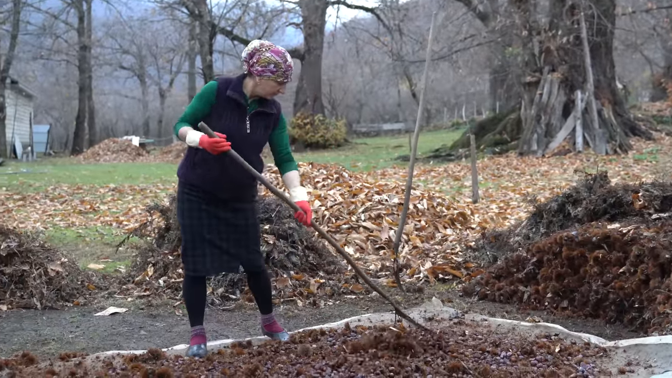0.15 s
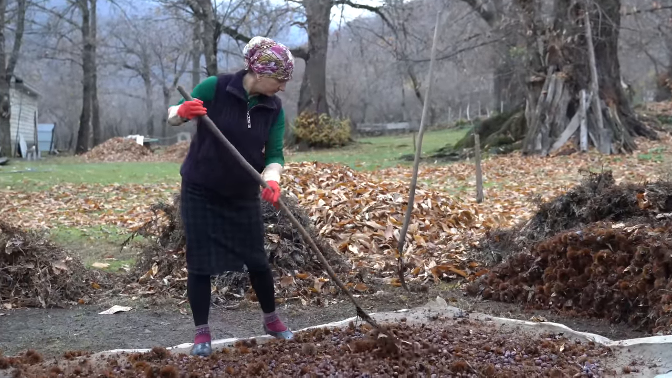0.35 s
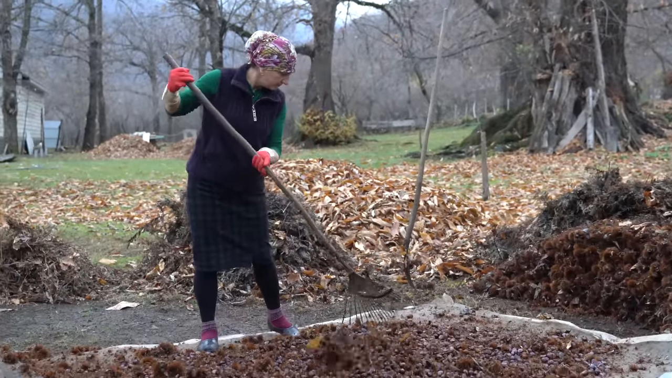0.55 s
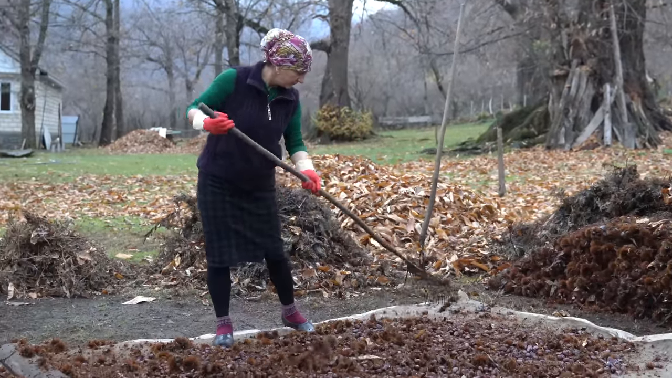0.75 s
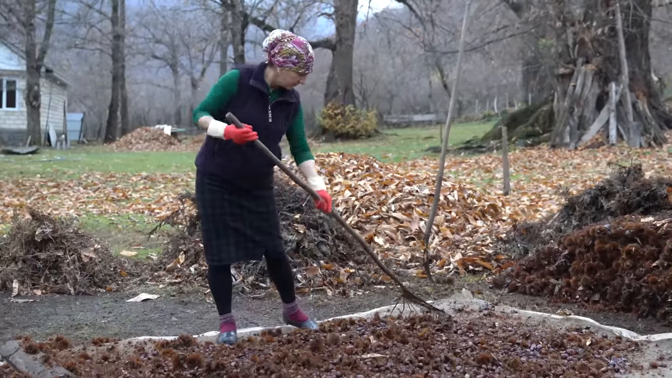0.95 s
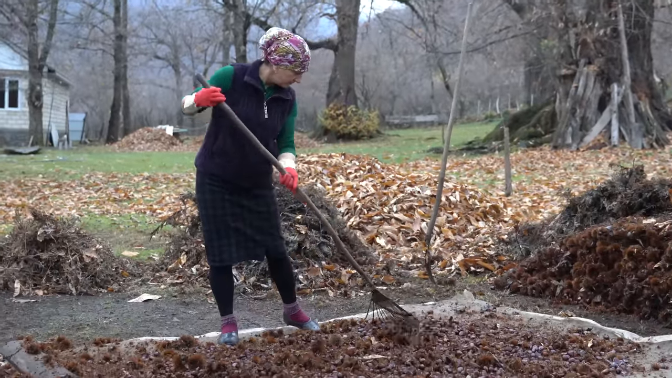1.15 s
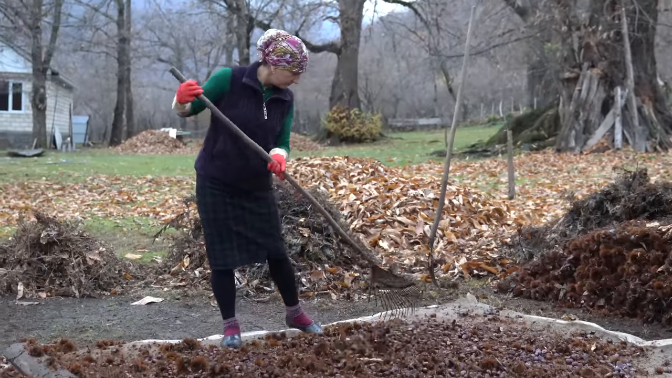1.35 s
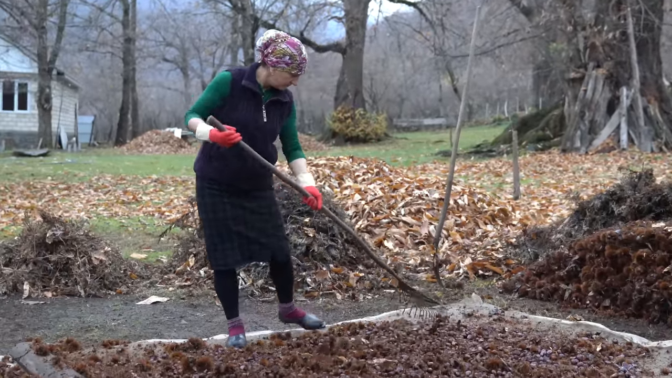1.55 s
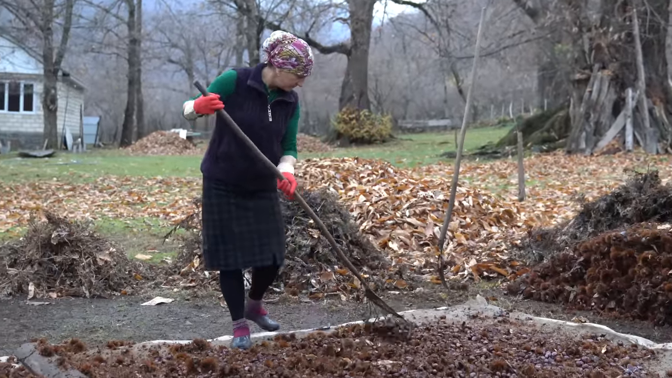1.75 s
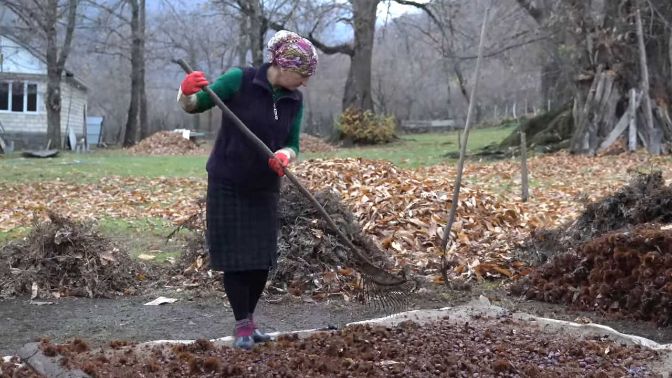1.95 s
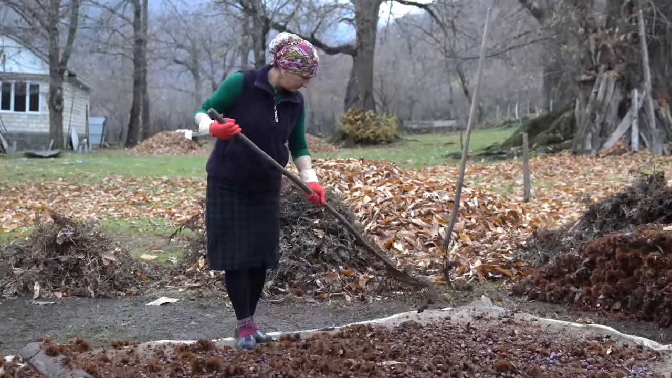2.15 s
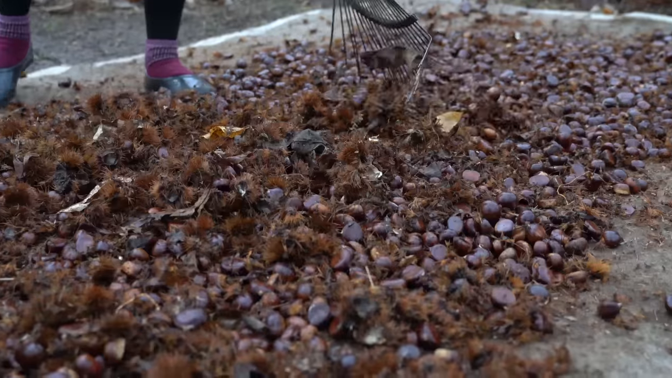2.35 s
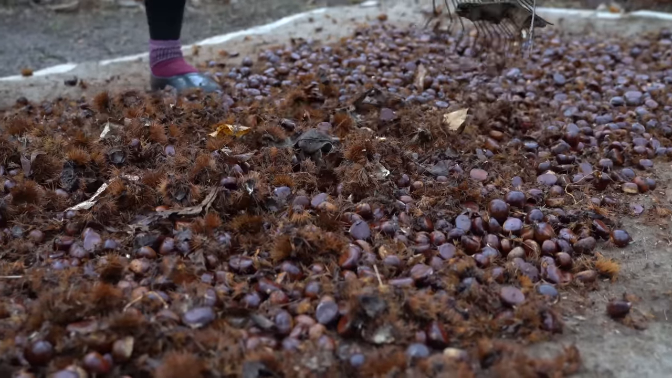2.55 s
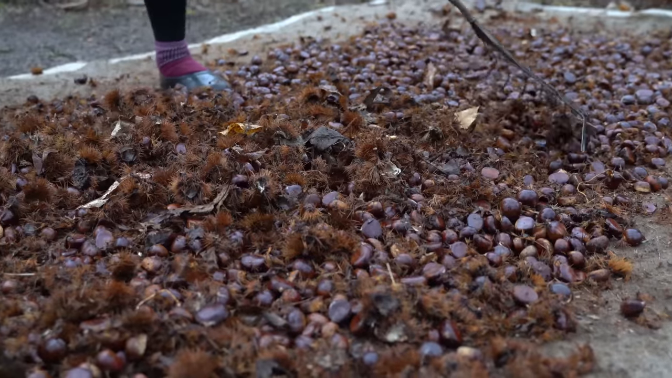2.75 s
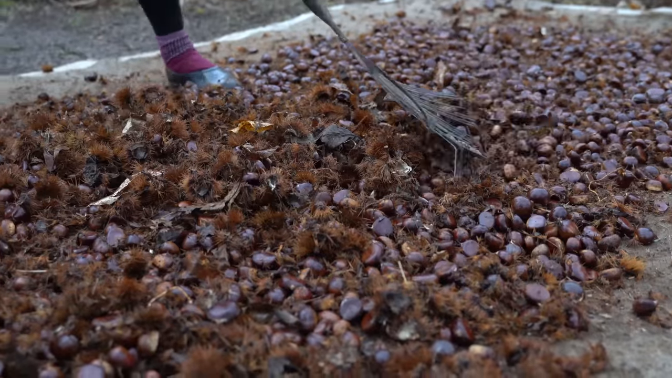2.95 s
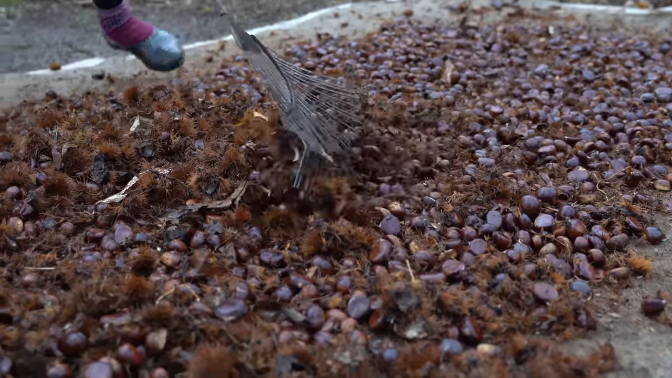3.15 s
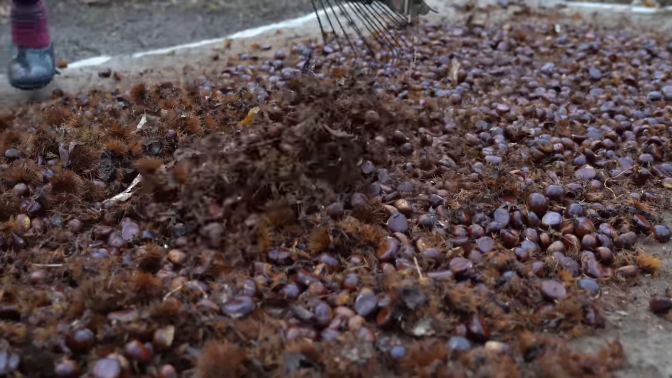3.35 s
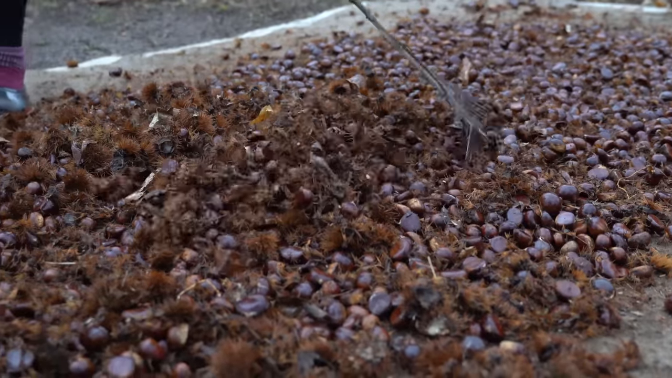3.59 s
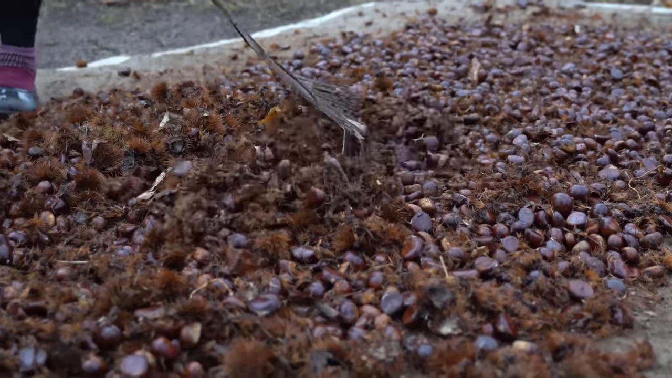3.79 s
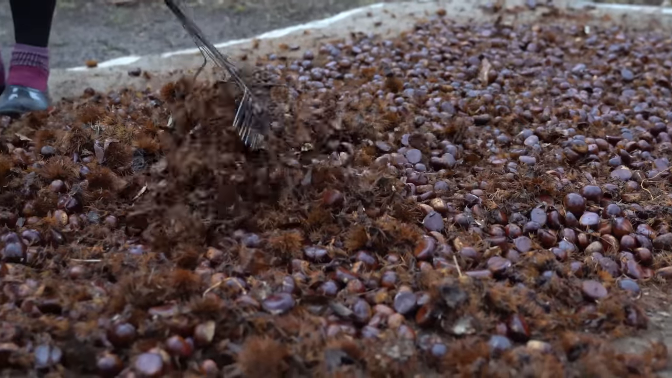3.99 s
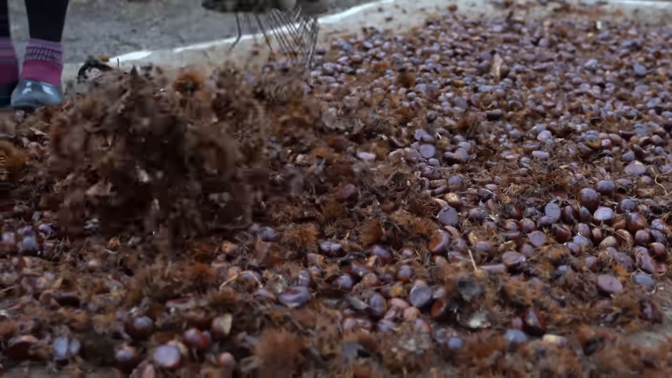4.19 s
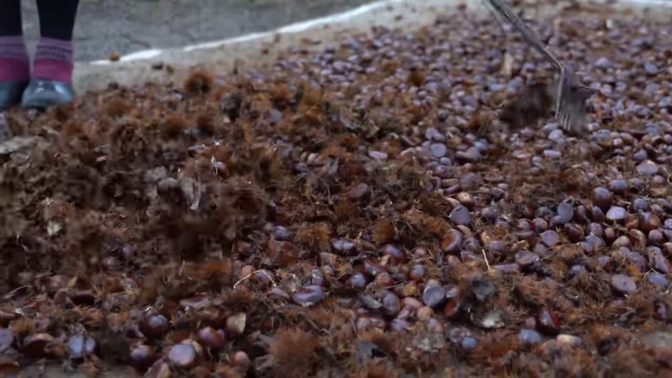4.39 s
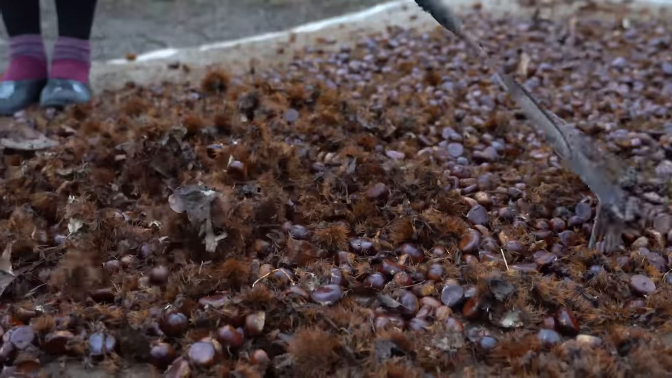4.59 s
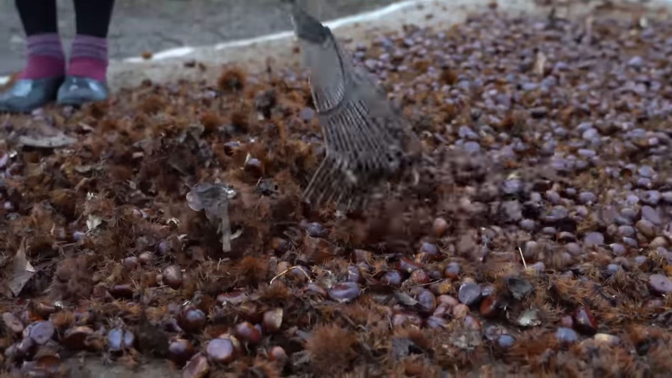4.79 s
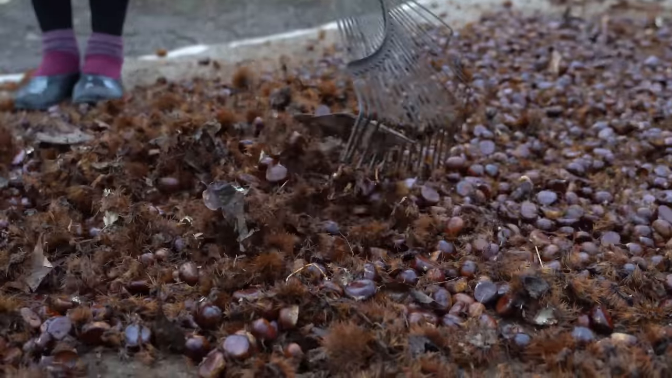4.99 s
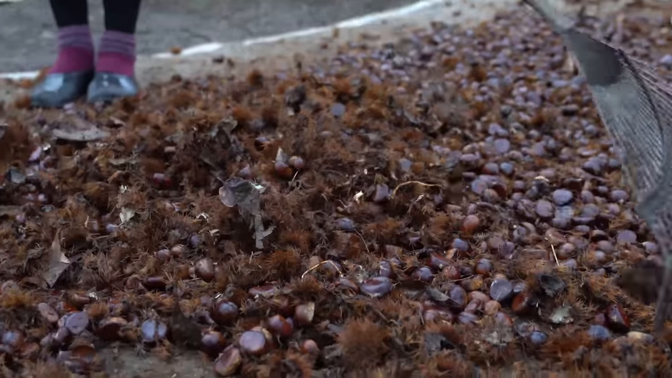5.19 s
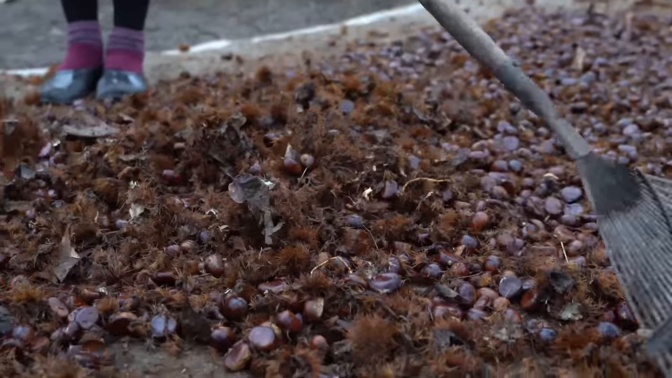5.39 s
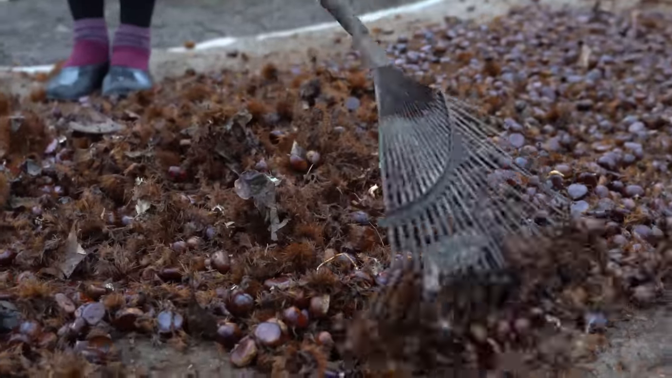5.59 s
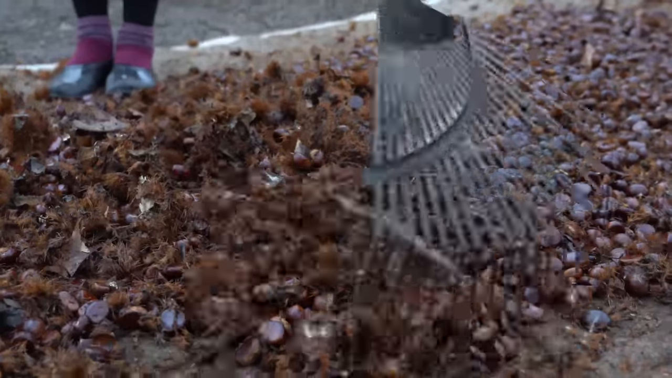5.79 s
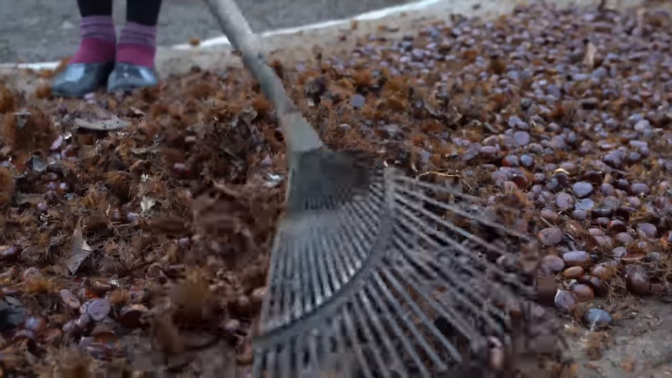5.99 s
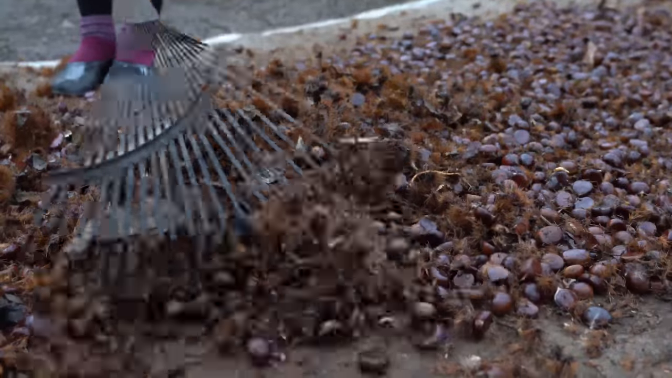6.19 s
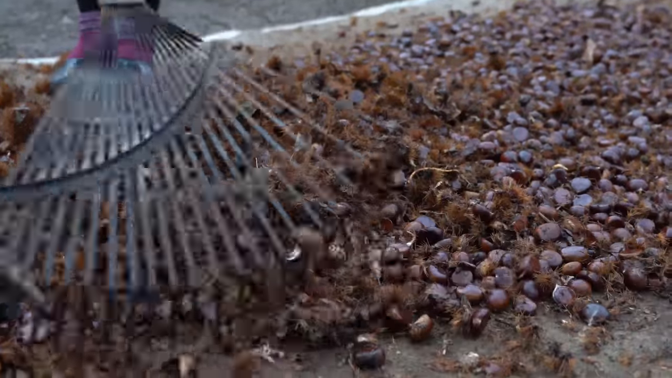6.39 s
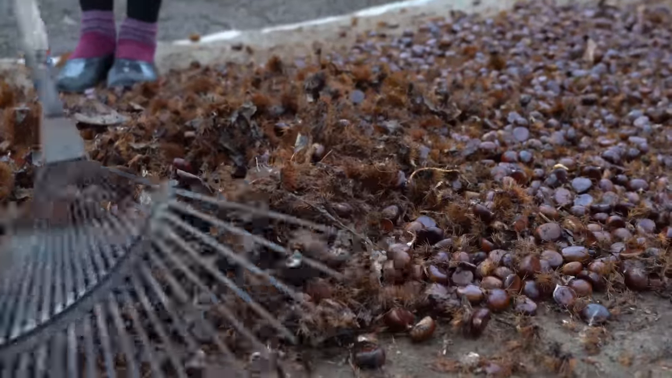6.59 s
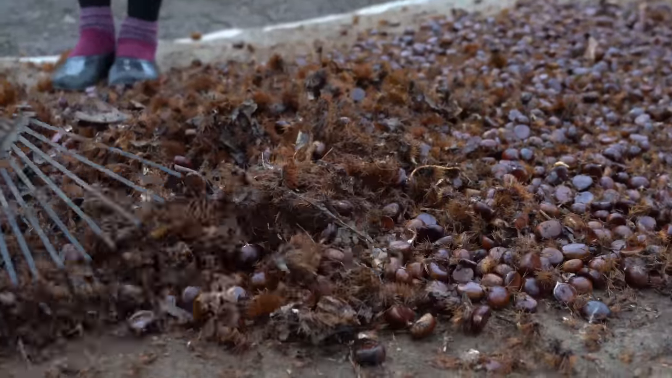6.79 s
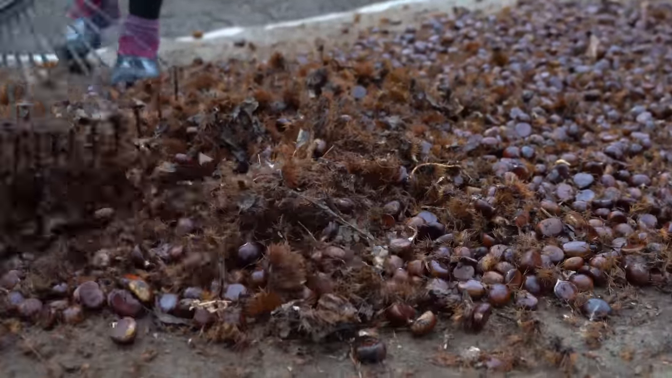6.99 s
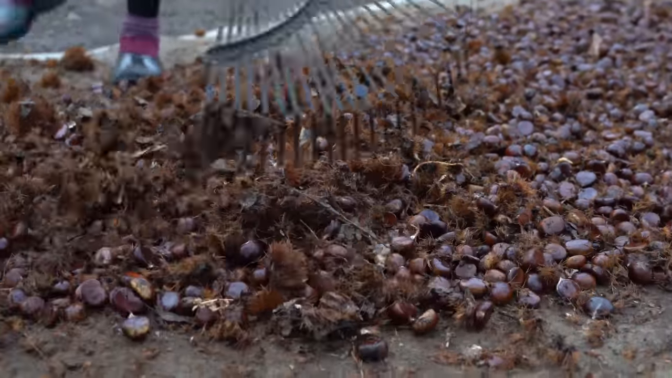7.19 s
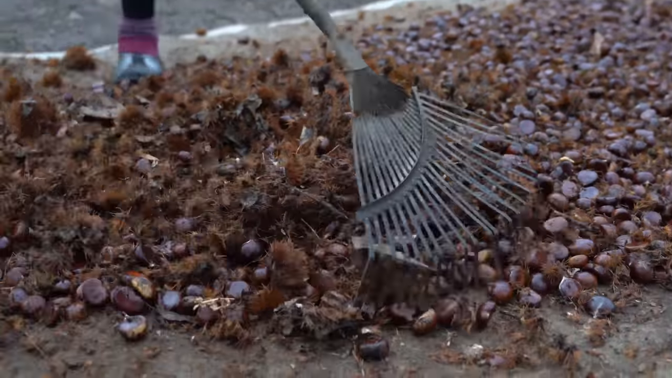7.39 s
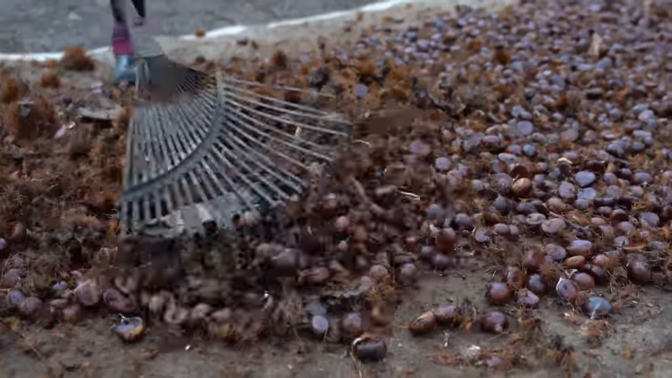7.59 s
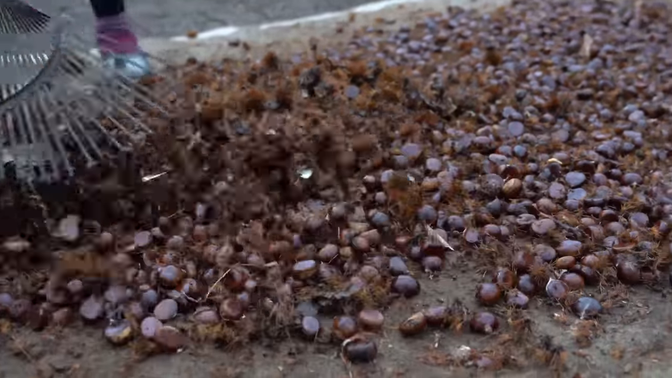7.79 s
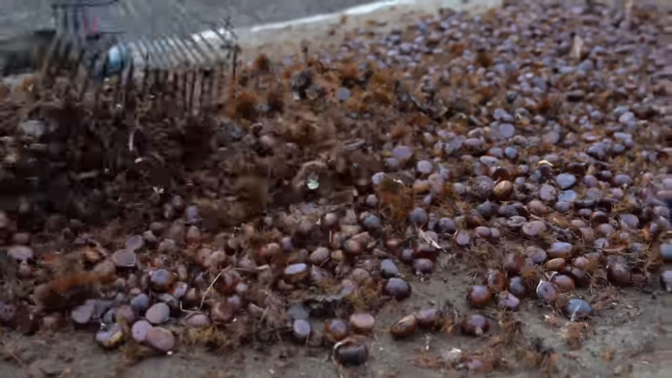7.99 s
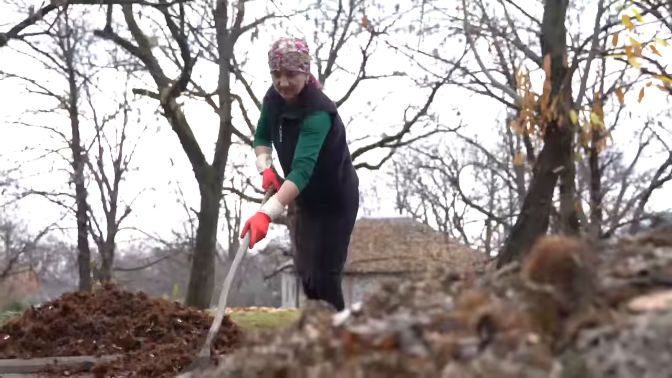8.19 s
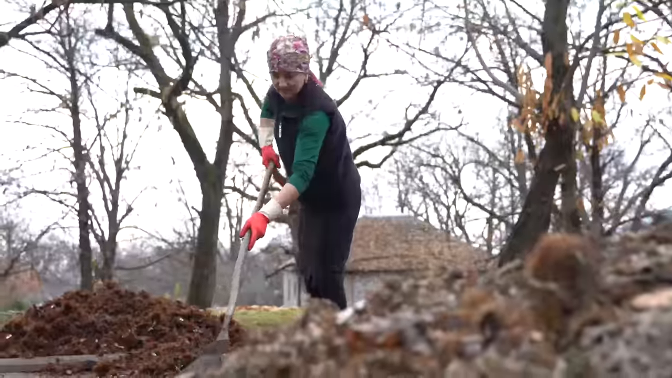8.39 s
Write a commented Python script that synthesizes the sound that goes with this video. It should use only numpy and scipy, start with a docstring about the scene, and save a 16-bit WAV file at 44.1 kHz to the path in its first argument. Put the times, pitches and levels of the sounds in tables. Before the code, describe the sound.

A steel rake scrapes in repeated strokes through dry crackling chestnut burrs, its tines rattling and loose nuts knocking, outdoors.

```python
"""Raking chestnut burrs.

A steel fan rake is pulled in twelve strokes through dry burrs, nuts and leaves. Spines crackle,
the heap shifts, tines catch, spring free and ring, and loose nuts knock as they settle.
The burrs' tone steps from a few paces away to close by, then to afar.
Behind it: quiet open air, faint distant hums, a few small birds."""
import sys
import numpy as np
from scipy import signal
from scipy.fft import rfft, irfft, next_fast_len
from scipy.io import wavfile
from scipy.ndimage import uniform_filter1d

SR = 44100
rng = np.random.default_rng(int(sys.argv[2]) if len(sys.argv) > 2 else 0)


def int16_out(signal):
    """Quantize to a 16-bit WAV file."""
    q = np.round(np.clip(np.atleast_2d(signal).T, -1, 1) * 32767)
    wavfile.write(sys.argv[1], SR, q.astype(np.int16))


N = 372644

# rake strokes; heap, tine and spine levels relative to the pull:
# start_s, to_full_speed_s, pull_db, rise_s, fall_s, heap_db, tine_db, spine_db, settle_db
RAKE_STROKES = [(0.189, 0.098, -42.5, 0.031, 0.31, -11.5, -7.0, 0.5, -57.5),
                (0.963, 0.18, -33, 0.04, 0.16, -21, -10, 2.5, -59),
                (1.69, 0.1, -38, 0.085, 0.093, -17.5, -6.5, 0, -57.5),
                (2.34, 0.028, -31, 0.11, 0.076, -24.5, -12, -4.5, -52.5),
                (2.796, 0.15, -25.5, 0.097, 0.12, -27.5, -9.5, -5, -43.5),
                (3.639, 0.12, -28.5, 0.069, 0.099, -22, -5, -4.5, -43.5),
                (4.617, 0.13, -23.5, 0.031, 0.11, -27, -6, -3, -48.5),
                (5.433, 0.14, -33.0, 0.045, 0.14, -15, -3, -1, -50),
                (6.004, 0.13, -28.0, 0.035, 0.091, -15, -5.5, -2.5, -47.5),
                (6.602, 0.14, -34, 0.04, 0.14, -10.5, -4, -2.5, -47),
                (7.412, 0.19, -33, 0.15, 0.13, -15, -1.5, 0, -49),
                (8.178, 0.13, -45, 0.12, 0.26, -25, -3.0, 1.5, -59)]
# tines bite or spring free; ring and spine relative: start_s, level_db, length_s, ring_db, spine_db
TINE_CATCHES = [(0.193, -48.5, 0.024, -0.5, 5.5), (0.254, -55, 0.012, -6, 12),
                (0.346, -31.5, 0.0059, -20, 2), (0.382, -39.5, 0.03, -10.5, 3.5),
                (0.6, -49.5, 0.013, -2.5, 0), (0.968, -41, 0.04, -8, -2.5), (1.027, -41, 0.017, -11, -5.5),
                (1.13, -34, 0.009, -14, 8.5), (1.703, -37, 0.013, -21, -3), (1.739, -34.5, 0.02, -25, -1.0),
                (1.792, -34.5, 0.039, -26, 3.5), (1.832, -34, 0.014, -15, 5.5),
                (2.023, -56, 0.022, -4, 0.5), (2.345, -34, 0.026, -3.5, 4), (2.379, -28, 0.015, -4, 0),
                (2.408, -46, 0.011, 4, 15.5), (2.633, -46.5, 0.0087, -15, -4.5),
                (2.8, -37, 0.025, -7.5, 1.5), (2.897, -22, 0.0066, -27, -10), (2.923, -22, 0.013, -8, -8),
                (2.947, -25.5, 0.025, -13, -1), (3.001, -30, 0.032, -4.5, -3),
                (3.087, -30.5, 0.027, -6, -4), (3.132, -37, 0.008, -5, 0), (3.176, -35, 0.012, -9, -2),
                (3.415, -44.5, 0.01, -7, -1), (3.643, -34.5, 0.026, -5.5, 0), (3.681, -25.5, 0.004, -25, 1),
                (3.75, -25.5, 0.018, -12, -3.5), (3.851, -32.5, 0.015, -1.5, 1.5),
                (4.154, -35, 0.03, -3.5, 0), (4.246, -44.5, 0.014, -2, -5), (4.408, -46.5, 0.024, 3, -8.5),
                (4.619, -35, 0.025, 0, -5.0), (4.675, -29, 0.054, -5, -5), (4.777, -27, 0.006, -18, 8.5),
                (5.439, -47.5, 0.022, 2, -0.5), (5.511, -37.5, 0.021, 1, -2), (5.761, -34.5, 0.019, 0, 3),
                (6.007, -42, 0.0089, 1, -3.0), (6.02, -35, 0.011, 3.5, -2.5),
                (6.066, -33.5, 0.049, -2, -4.5), (6.354, -35, 0.014, -1, 4), (6.603, -35.5, 0.02, -5, -9),
                (6.752, -29, 0.01, -16, -5.5), (6.892, -40.5, 0.011, 5, -18), (7.139, -59, 0.0057, 7, 6),
                (7.419, -35, 0.034, 0, 0.5), (7.494, -37, 0.032, 2, -9.5), (7.535, -24.5, 0.0057, -20, 1.5),
                (7.607, -32, 0.021, -1.5, 7), (7.743, -35.5, 0.016, -4, 1), (7.793, -41.5, 0.039, 2, 1),
                (7.838, -37.5, 0.011, 3, -6), (7.982, -41, 0.0067, -10.0, -2.5)]
# nuts hit each other or the ground: start_s, level_db, pitch_hz
NUT_KNOCKS = [(0.057, -48, 1120), (.076, -46, 1090), (.147, -43, 623), (.221, -41, 1030),
              (3.39, -38.5, 905), (3.56, -46.5, 443), (4.304, -39, 790), (4.333, -31, 1390),
              (4.414, -30, 1130), (5.0577, -37, 644), (6.5022, -27.5, 1790), (6.602, -37, 890),
              (7.08, -36, 1110), (7.138, -31.5, 1285), (7.198, -46, 1260), (7.213, -39, 1170),
              (7.256, -42, 2400)]
# a nut hits the fan of tines: start_s, level_db
FAN_STRIKES = [(3.281, -19.5), (4.1545, -37)]
# tines pressed through to hard ground: start_s, end_s, ring_db, rumble_db
GROUND_SCRAPES = [(5.475, 5.6, -54, -62.5), (5.552, 5.712, -31, -86), (6.043, 6.212, -37, -61),
                  (6.704, 6.837, -78, -60), (7.48, 7.664, -58, -80)]
# struck fan: pitch_hz, gain_db, t60_s
FAN_MODES = [(1044, -11, 0.086), (1170, 7.5, 0.017), (1470, -3, 0.044), (1850, -2, 0.044),
             (2430, -2, 0.036), (3300, -8, 0.036), (3700, -8, 0.034), (5400, -3, 0.019)]
# dragged tines and bent tines: centre_hz, width_hz, gain_db
TINE_MODES = [(1235, 24, -4.5), (1433, 150, -8.5), (1555, 31, 1), (1743, 240, -3), (2007, 230, -3.5),
              (2490, 150, -2.5), (3343, 94, -4.5), (3710, 39, -3), (3900, 68, -34), (5230, 52, -49),
              (5780, 97, 3)]
BENT_TINE_MODES = [(1260, 85, -2.5), (1338, 49, 4), (1560, 66, -5), (2550, 110, -4), (2623, 88, 0)]
# burr bed spectrum from each standpoint: freq_hz, gain_db
BED_MID_SPECTRUM = [(47, -71), (80, -46), (289, -41.5), (331, -40.5), (858, -19.5), (1090, -19),
                    (1280, -7.5), (3100, -7), (3700, -2), (4230, -7.5), (4830, -1), (7870, -3.5),
                    (8600, -8), (15000, -14), (16000, -14)]
BED_NEAR_SPECTRUM = [(47, -59), (80, -24), (222, -27), (629, -13), (687, -12), (1090, -5.5), (1280, 2.5),
                     (1600, -2.5), (2220, -3), (2490, -2), (3030, -5), (5520, -2.5), (8790, -8),
                     (15000, -7.5), (16000, -17.5)]
BED_FAR_SPECTRUM = [(47, -70), (80, -10), (265, -12), (527, -27), (643, -6), (785, -15), (1020, -1),
                    (1780, -6.5), (3790, -5), (7870, 1), (16000, -13)]
# standpoint switches, mid to near and near to far: time_s
STANDPOINT_SWITCHES_S = [2.335, 8.175]
# rake position: time_s, left_minus_right_db
RAKE_PAN = [(.3, -2), (1.2, -1.5), (1.8, -2.5), (2.4, -2), (3, -1.5), (3.8, -1), (4.7, -1), (5.2, -1.5),
            (5.6, -2.5), (6.1, -1), (6.8, -0.5), (7.3, -0.5), (7.6, -1.5), (8.3, 0.5)]
# open air: freq_hz, gain_db
AIR_SPECTRUM = [(15, -61), (25, -33), (127, -3.5), (185, -3), (754, 5.5), (818, 1.5), (2000, 0), (2220, -3),
                (2840, 0), (7310, -16), (8830, -13), (14800, -13), (16000, 3)]
# distant tones: start_s, end_s, pitch_hz, fundamental_db, octave_db
DISTANT_HUMS = [(0, 8.45, 69.4, -102, -88), (4.3, 5.4, 100, -89, -97), (4.4, 4.7, 540, -84, -68),
                (4.9, 5.45, 565, -79, -76)]
# small birds: start_s, length_s, start_hz, end_hz, level_db
BIRD_CHIRPS = [(0, 0.019, 2550, 2720, -49), (0.064, 0.033, 2780, 2590, -49), (0.14, 0.068, 2700, 2460, -53),
               (4.498, 0.024, 2170, 2780, -41.5), (4.52, .018, 5650, 6070, -41),
               (4.58, 0.012, 6000, 5900, -46)]
# left-right likeness: freq_hz, correlation
STEREO_CORRELATION = [(100, 1), (600, 0.84), (1400, 0.99), (2500, 0.18), (3900, 0.79), (6000, 0.39),
                      (9000, 0.29), (15000, 0.24)]
# microphone balance: freq_hz, left_minus_right_db
MIC_BALANCE = [(60, -3), (92, 0), (140, 1), (210, 0), (330, 1), (500, 2), (770, 1), (1170, 3), (1790, -0.5),
               (2740, 6), (4190, 1), (6410, -0.5), (9810, 0), (15000, -3)]
# microphone phase: freq_hz, left_lead_rad
MIC_PHASE = [(0, 0.3), (1460, -0.54), (1720, 0.83), (2580, -0.5), (3270, -0.68), (4910, -0.23),
             (8350, -0.14), (9300, 1.2), (11200, -1.44), (13200, 0.31), (13600, -0.21), (16500, -0.3)]

RISE_POWER, FALL_POWER = 0.86, 2.12  # a pull builds to a tug, eases off smoothly
INITIAL_UNREST_DB, SETTLE_DB_PER_S = -61, 20.5
CATCH_ATTACK_S, DEBRIS_DB, DEBRIS_DECAY_S = 0.0013, -16.5, 0.065
HUSK_PATCH_DB, CLUMP_DB, CLUMPS_PER_S = 2.8, 1.8, 55
CHIRP_JITTER_HZ = 900
CUTOFF_HZ = 15950


def amp(db):
    """Decibels to gain."""
    return 10 ** (np.asarray(db) / 20)


def unit(pair):
    """Stereo pair scaled to a centre rms of 1."""
    return pair / np.sqrt(np.mean(pair.mean(0) ** 2) + 1e-20)


def along(points, hz):
    """(freq_hz, value) points read on a log axis."""
    freq_hz, values = np.transpose(points)
    return np.interp(np.log(hz + 1), np.log(freq_hz + 1), values)


def filtered(x, response):
    """Apply a frequency response."""
    size = next_fast_len(N + 8192, True)
    return irfft(rfft(x, size) * response(np.fft.rfftfreq(size, 1 / SR)), size)[..., :N]


def band(hz, lo_hz, hi_hz, order=10):
    """Soft-edged band-pass gain."""
    return 1 / np.sqrt((1 + (lo_hz / (hz + 1)) ** order) * (1 + (hz / hi_hz) ** order))


def add(track, start_s, sound):
    """Mix a sound into a track."""
    part = track[..., max(round(start_s * SR), 0):][..., :sound.shape[-1]]
    part += sound[..., :part.shape[-1]]


def gate(start_s, end_s, fade_s):
    """On between two times, with linear fades."""
    t = np.arange(N) / SR
    return np.clip(np.minimum(t - start_s, end_s - t) / fade_s, 0, 1)


def shower(per_s, spread_db, life_s):
    """Envelope of random breaks, rms 1: instant onset, exponential decay."""
    breaks = rng.random(N) < per_s / SR
    sizes = amp(spread_db * np.clip(rng.standard_normal(N), -2, 2))
    energy = signal.lfilter([1], [1, -np.exp(-2 / (life_s * SR))], breaks * sizes ** 2)
    return np.sqrt(energy / energy.mean())


def patchy(depth_db=HUSK_PATCH_DB):
    """Two noises of shifting colour, as from husks of differing size."""
    spectra = signal.stft(rng.standard_normal((2, N)), nperseg=512)[2]
    patches = uniform_filter1d(rng.standard_normal(spectra.shape[1:]), size=3, axis=0)
    patches = uniform_filter1d(patches, size=8, axis=1)
    gain = amp(depth_db * np.clip(patches / patches.std(), -2, 2))
    return signal.istft(spectra * gain, nperseg=512)[1][:, :N]


def stereo(pair, colour):
    """Colour two unrelated signals and mix them as mid and side, most alike in the bass."""
    def response(hz):
        angle_rad = np.arccos(np.clip(along(STEREO_CORRELATION, hz), -1, 1)) / 2
        return colour(hz) * np.array([np.ones_like(hz), np.tan(angle_rad)])
    mid, side = filtered(pair, response)
    return np.array([mid + side, mid - side])


def air():
    """Faint steady rush of open country."""
    rush = stereo(patchy(0.85), lambda hz: amp(along(AIR_SPECTRUM, hz)) * band(hz, 45, 22000, order=4))
    return amp(-60.5) * unit(rush)


def humming():
    """Distant tones plus octave, wavering in pitch."""
    out = np.zeros(N)
    for start_s, end_s, pitch_hz, fundamental_db, octave_db in DISTANT_HUMS:
        waver = np.interp(np.arange(N), np.linspace(0, N, 160), rng.standard_normal(160))
        phase = 2 * np.pi * np.cumsum(pitch_hz * (1 + 0.014 * waver)) / SR
        tone = amp(fundamental_db) * np.sin(phase) + amp(octave_db) * np.sin(2 * phase)
        out += gate(start_s, end_s, fade_s=0.022) * np.sqrt(2) * tone
    return out


def birds():
    """Short gliding chirps, blurred by echoes from the trees."""
    chirps = np.zeros(N)
    for start_s, length_s, start_hz, end_hz, level_db in BIRD_CHIRPS:
        glide_hz = np.linspace(start_hz, end_hz, round(length_s * SR))
        glide_hz += CHIRP_JITTER_HZ * rng.standard_normal(len(glide_hz))
        phase = 2 * np.pi * np.cumsum(glide_hz) / SR
        add(chirps, start_s, amp(level_db) * np.hanning(len(phase)) * np.sin(phase))
    t = np.arange(SR // 4) / SR
    tail = rng.standard_normal((2, len(t))) * amp(-60 * t / 0.22)
    echoes = signal.fftconvolve(chirps[None], tail / np.linalg.norm(tail[0]), axes=1)[:, :N]
    return amp(-4) * chirps + amp(-7) * echoes


def bed(grains, lo_hz, hi_hz):
    """One band of the burr bed, rms about 1, coloured by the current standpoint."""
    standpoint = np.searchsorted(STANDPOINT_SWITCHES_S, np.arange(N) / SR)
    voices = [unit(stereo(grains, lambda hz: amp(along(spectrum, hz)) * band(hz, lo_hz, hi_hz)))
              for spectrum in (BED_MID_SPECTRUM, BED_NEAR_SPECTRUM, BED_FAR_SPECTRUM)]
    return np.choose(standpoint, voices)


def clumps():
    """Random gain, rms 1: burrs lie in clumps, so the crackle swells and thins."""
    knots = np.clip(rng.standard_normal(int(N / SR * CLUMPS_PER_S)), -2, 2)
    gain = amp(CLUMP_DB * np.interp(np.arange(N), np.linspace(0, N, len(knots)), knots))
    return gain / np.sqrt(np.mean(gain ** 2))


def settling():
    """Nuts and husks loosened by each pull rustle and tick into place."""
    power, t = np.zeros((2, N)), np.arange(2 * SR) / SR
    add(power, 0, amp(INITIAL_UNREST_DB - SETTLE_DB_PER_S * t) ** 2)
    for start_s, to_full_speed_s, *_, spine_db, settle_db in RAKE_STROKES:
        decay_db = SETTLE_DB_PER_S * np.maximum(t - to_full_speed_s, 0)
        unrest = np.minimum(t / to_full_speed_s, 1) * amp(settle_db - decay_db)
        add(power, start_s, np.outer([1, amp(spine_db)], unrest) ** 2)
    loose, prickly = np.sqrt(power)
    creaks = shower(per_s=260, spread_db=1, life_s=0.012)
    heap = amp(-5) * bed(creaks * patchy(4.2), 200, 1080)
    rustle = amp(2.5) * bed(creaks * patchy(), 1410, 6500)
    prickles = shower(per_s=480, spread_db=-5.5, life_s=0.0043)
    fizz = amp(1) * bed(prickles * patchy(1.1), 7700, 16000)
    nuts = shower(per_s=45, spread_db=2.5, life_s=0.0012) * patchy(4)
    husks = shower(per_s=60, spread_db=2.5, life_s=0.0008) * patchy(4)
    ticks = amp(-6) * bed(nuts, 700, 2730) + amp(-5) * bed(husks, 2300, 18000)
    return clumps() * (prickly * clumps() * fizz + loose * (heap + rustle + ticks))


def knocking():
    """Nuts knock dully for two or three cycles, with a tick of shell."""
    out, t = np.zeros(N), np.arange(SR // 25) / SR
    for start_s, level_db, pitch_hz in NUT_KNOCKS:
        cycles = pitch_hz * t
        body = np.sin(2 * np.pi * cycles) + 0.25 * np.sin(2 * np.pi * 3.6 * cycles)
        tick = 0.14 * rng.standard_normal(len(t))
        age = cycles / 0.49  # envelope peaks at age 1
        add(out, start_s, amp(level_db) * (body + tick) * age * np.exp(1 - age))
    return filtered(out, lambda hz: band(hz, 280, 9000, order=6))  # knocks carry nothing below about 300 Hz


def pulls():
    """Heap, tine, burr and spine envelopes, driven by pull speed."""
    power, t = np.zeros((4, N)), np.arange(SR) / SR
    for start_s, to_full_speed_s, pull_db, rise_s, fall_s, heap_db, tine_db, spine_db, _ in RAKE_STROKES:
        past_peak_s = t - to_full_speed_s
        rising = np.abs(past_peak_s / rise_s) ** RISE_POWER
        falling = np.abs(past_peak_s / fall_s) ** FALL_POWER
        speed = np.exp(-np.where(past_peak_s < 0, rising, falling))
        gains = amp(pull_db + np.array([heap_db, tine_db, 0, spine_db]))
        add(power, start_s, np.outer(gains, speed) ** 2)
    return np.sqrt(power)


def steel(taps, modes):
    """Taps ring the tine resonances, summed with alternating sign."""
    def response(hz):
        ring = sum((-1) ** k * amp(gain_db) * 1j * hz * width_hz
                   / (centre_hz ** 2 - hz ** 2 + 1j * hz * width_hz)
                   for k, (centre_hz, width_hz, gain_db) in enumerate(modes))
        return ring * band(hz, 840, 9000, order=5)
    return unit(stereo(taps, response))


def dragging():
    """The rake moves in small slips; each breaks spines, jolts the tines and shoves the heap."""
    shove, jolt, crunch, snap = pulls()
    slips = np.sqrt(0.25 + 0.75 * shower(per_s=190, spread_db=2.5, life_s=0.008) ** 2)
    cracks = slips * shower(per_s=6000, spread_db=1, life_s=0.0009)
    bumps = slips * shower(per_s=1600, spread_db=6, life_s=0.0076)
    heap = amp(2) * shove * bed(bumps * patchy(1.2), 197, 974)
    ground = amp(-26) * shove * bed(bumps * patchy(4.5), 35, 250)
    husks = amp(-1) * jolt * bed(bumps * patchy(3.7), 740, 2600)
    tines = jolt * steel(bumps * patchy(), TINE_MODES)
    burrs = amp(-1.5) * crunch * bed(cracks * patchy(), 2120, 5950)
    tufts = shower(per_s=500, spread_db=1, life_s=0.014)  # fine spines give way together
    spines = amp(-1.5) * snap * bed(tufts * cracks * patchy(), 7630, 25000)
    return ground + heap + husks + tines + clumps() * (burrs + clumps() * spines)


def catching():
    """A tine springs free and tears through the burrs, trailed by falling bits."""
    power, t = np.zeros((3, N)), np.arange(SR // 2) / SR
    attack = 1 - np.exp(-t / CATCH_ATTACK_S)
    debris = amp(DEBRIS_DB) * np.exp(-t / DEBRIS_DECAY_S)
    for start_s, level_db, length_s, ring_db, spine_db in TINE_CATCHES:
        burst = attack * (np.exp(-(t / length_s) ** 2) + debris)
        gains = amp(level_db + np.array([0, ring_db, spine_db]))
        add(power, start_s, np.outer(gains, burst) ** 2)
    crunch, ring, snap = np.sqrt(power)
    cracks = shower(per_s=3500, spread_db=1.5, life_s=0.0007)
    burrs = amp(1.5) * crunch * bed(cracks * patchy(), 2380, 5700)
    spines = amp(-1) * snap * bed(cracks * patchy(), 6950, 10600)
    tips = amp(1.5) * snap * bed(cracks * patchy(), 10900, 24000)
    tines = amp(-2.5) * ring * steel(patchy(), TINE_MODES)
    husks = amp(-0.5) * ring * bed(patchy(4.7), 450, 2160)
    tearing = burrs + spines + tips + tines + husks
    return filtered(tearing, lambda hz: band(hz, 296, 25000, order=6))  # the tearing carries no bass


def clanking():
    """A nut's hard blow rings and rattles the whole fan."""
    out, t = np.zeros(N), np.arange(SR // 6) / SR
    attack = 1 - np.exp(-t / 0.0013)
    for start_s, level_db in FAN_STRIKES:
        ring = np.zeros(len(t))
        for pitch_hz, gain_db, t60_s in FAN_MODES:
            decay = amp(gain_db + rng.normal(0, 1.5) - 60 * t / t60_s)
            ring += decay * np.sin(2 * np.pi * (pitch_hz * t + rng.random()))
        rattle = amp(-2 - 60 * t / 0.043) * rng.standard_normal(len(t))
        add(out, start_s, amp(level_db - 6) * (ring + rattle) * attack)
    return filtered(out, lambda hz: band(hz, 630, 6800, order=6))


def scraping():
    """Bent tines stick and slip on hard ground: the steel sings, the ground rumbles."""
    ring, rumble = np.zeros((2, N))
    for start_s, end_s, ring_db, rumble_db in GROUND_SCRAPES:
        ring += amp(ring_db) * gate(start_s, end_s, fade_s=0.032)
        rumble += amp(rumble_db) * gate(start_s, end_s, fade_s=0.024)
    chatter = shower(per_s=1600, spread_db=9.5, life_s=0.0012) * rng.standard_normal((2, N))
    ground = unit(stereo(chatter, lambda hz: band(hz, 187, 320, order=8)))
    return ring * steel(chatter, BENT_TINE_MODES) + rumble * ground


def scene():
    """Panned rake, burrs and nuts over the outdoor background."""
    rake = dragging() + scraping() + settling() + catching() + knocking() + clanking()
    pan_db = np.interp(np.arange(N) / SR, *np.transpose(RAKE_PAN))
    return rake * amp(np.outer([0.5, -0.5], pan_db)) + birds() + humming() + air()


def record(dry):
    """Per-microphone colour and phase, then a hard low-pass."""
    sides = np.array([[0.5], [-0.5]])
    def response(hz):
        gain = amp(sides * along(MIC_BALANCE, hz))
        phase_rad = sides * along(MIC_PHASE, hz)
        return gain * np.exp(1j * phase_rad) * (hz < CUTOFF_HZ)
    return filtered(dry, response)


dry = scene()
out = record(dry)
int16_out(out)
```